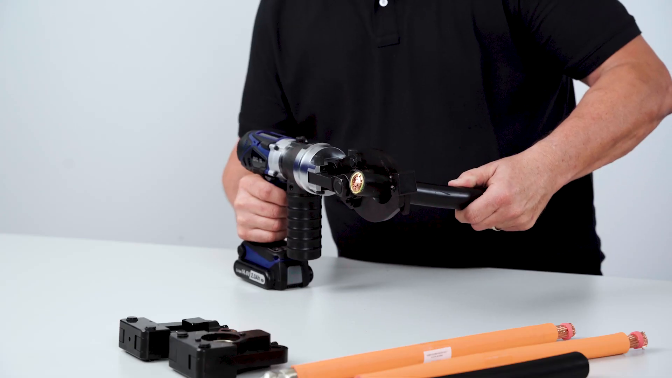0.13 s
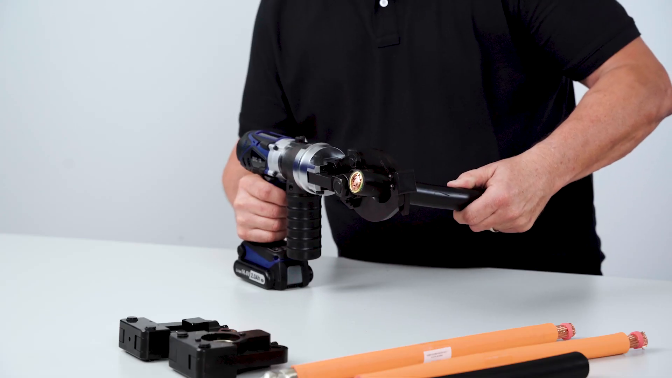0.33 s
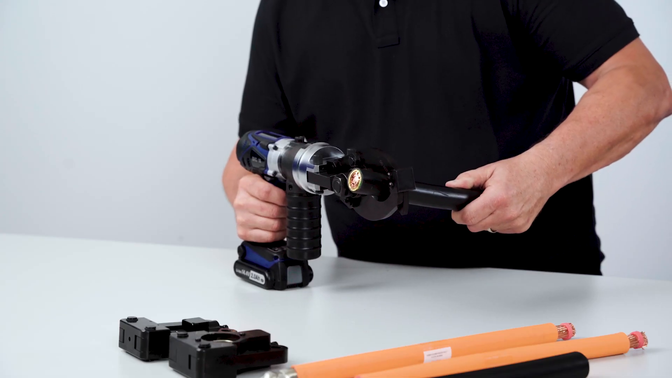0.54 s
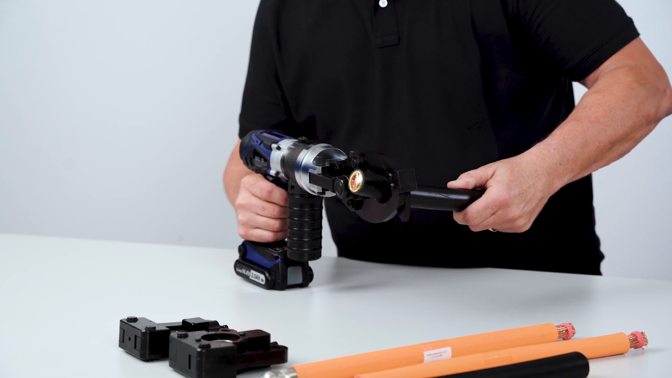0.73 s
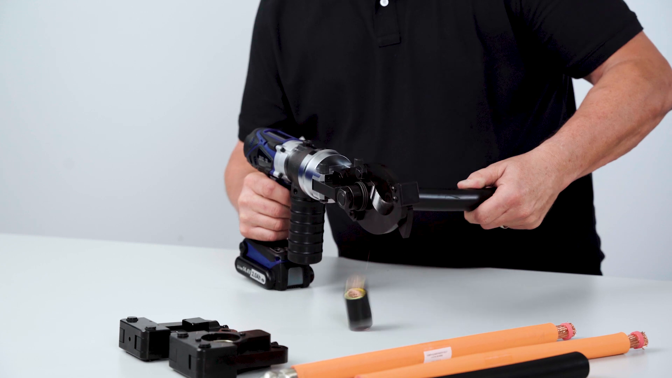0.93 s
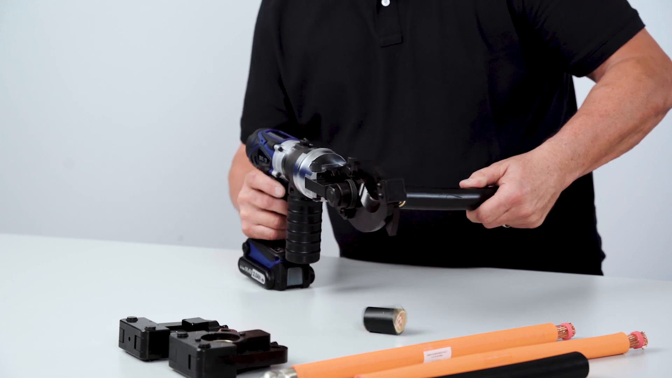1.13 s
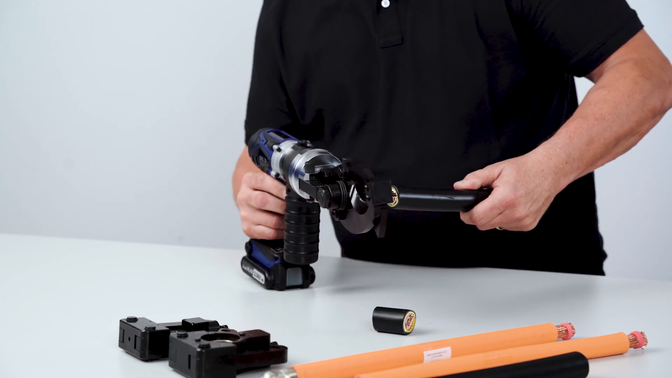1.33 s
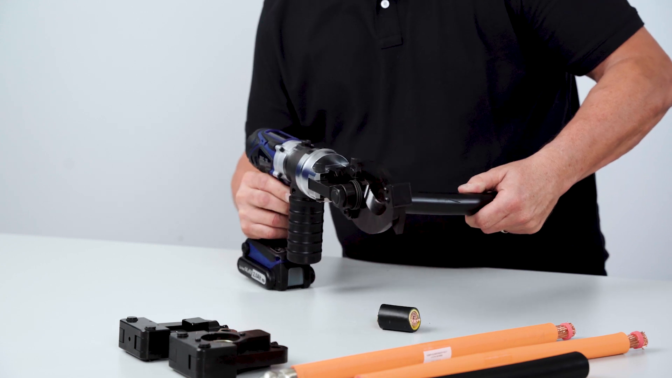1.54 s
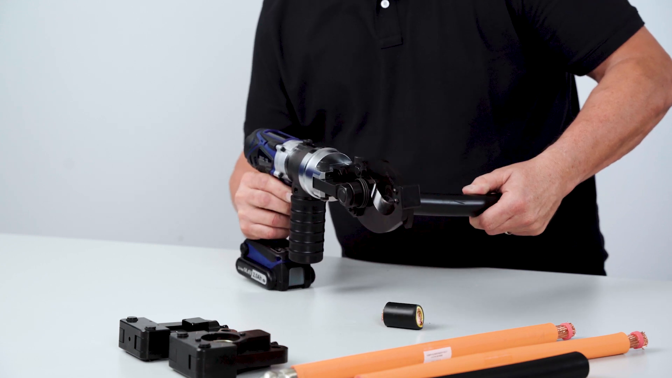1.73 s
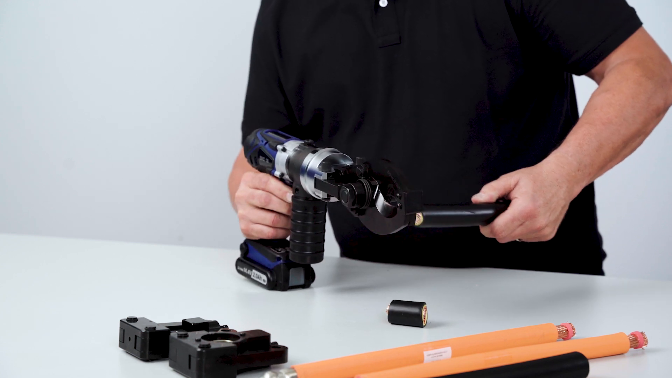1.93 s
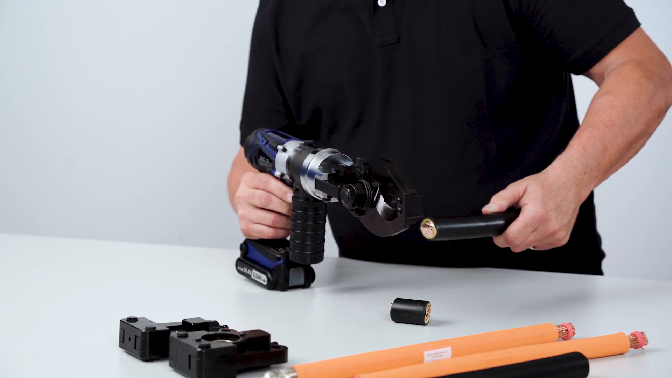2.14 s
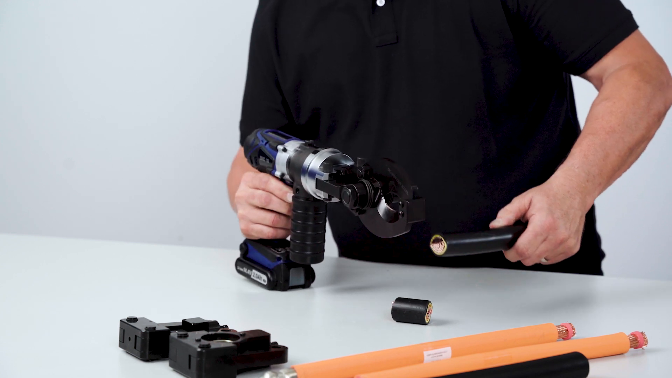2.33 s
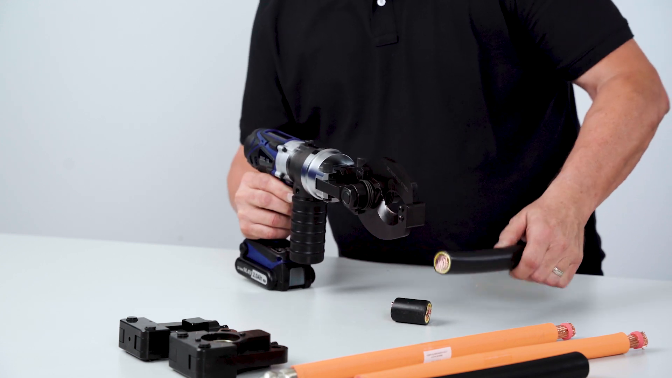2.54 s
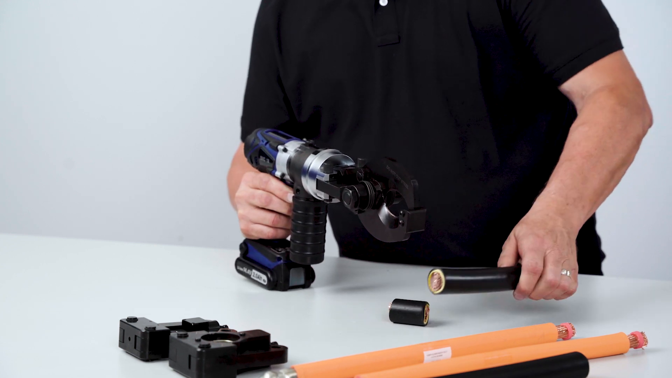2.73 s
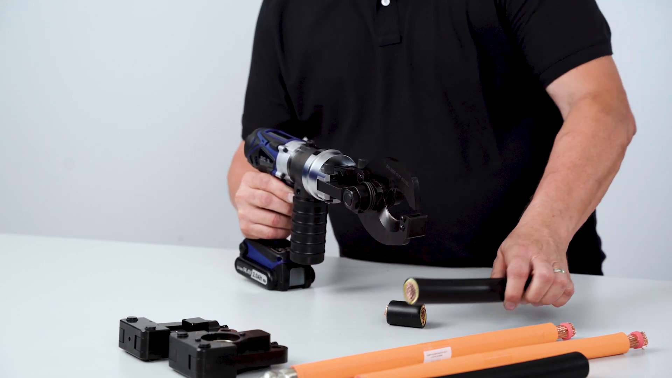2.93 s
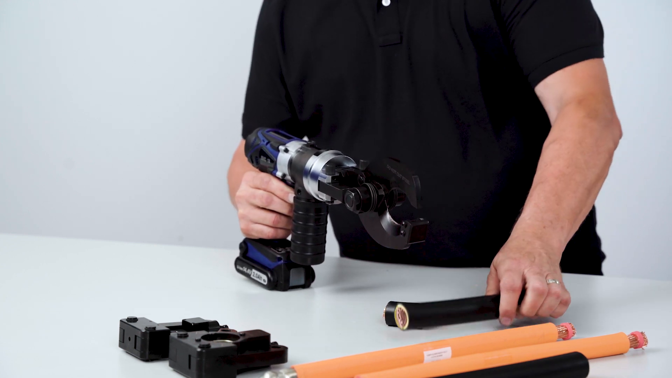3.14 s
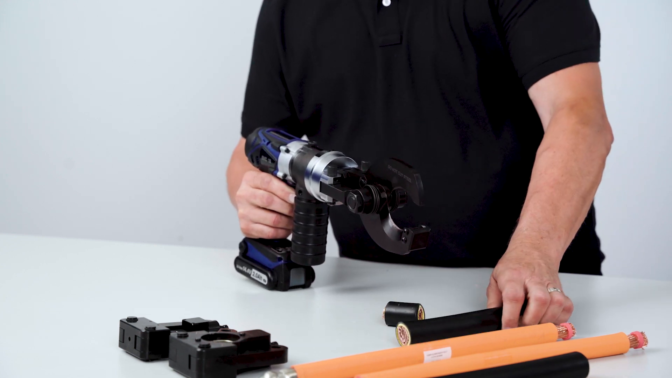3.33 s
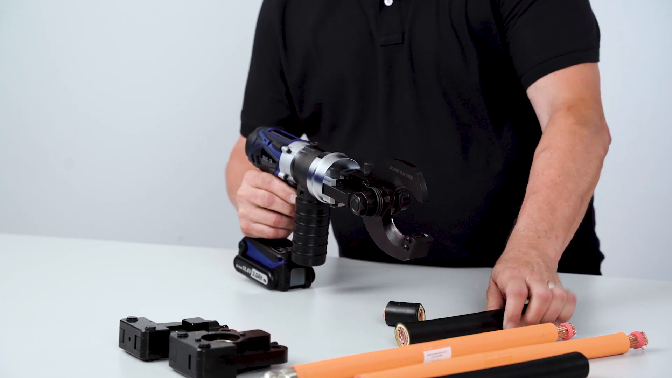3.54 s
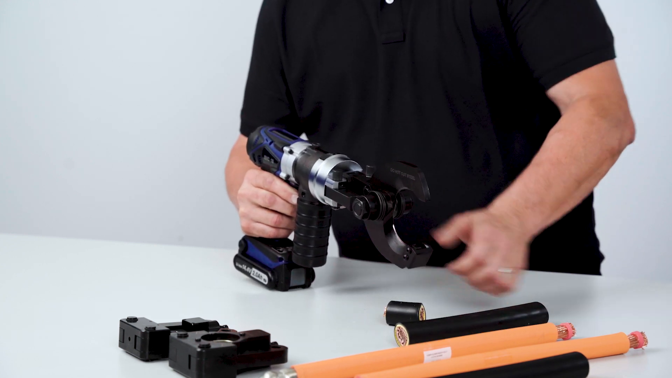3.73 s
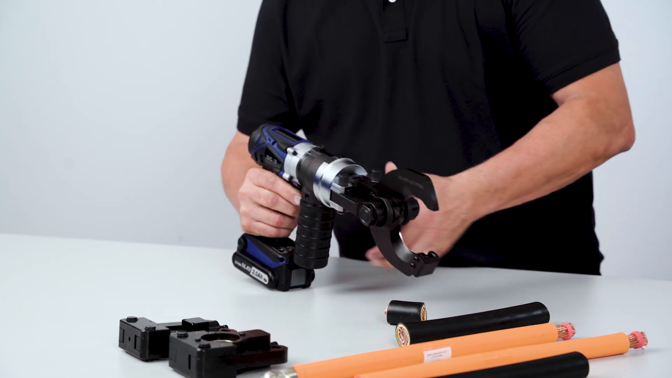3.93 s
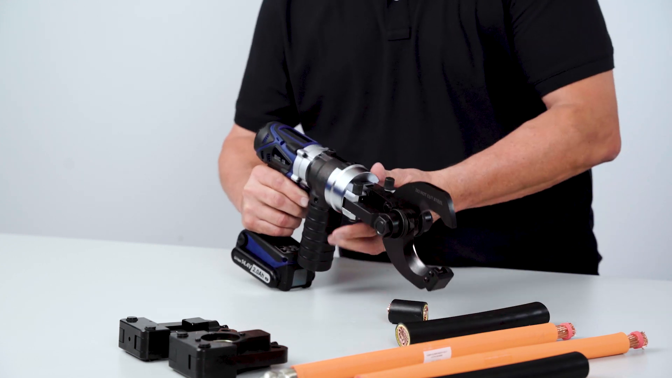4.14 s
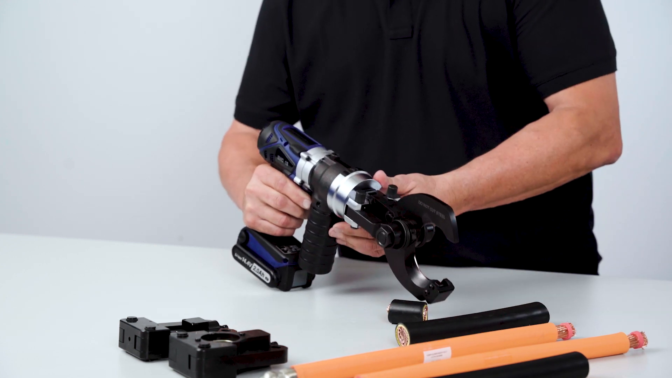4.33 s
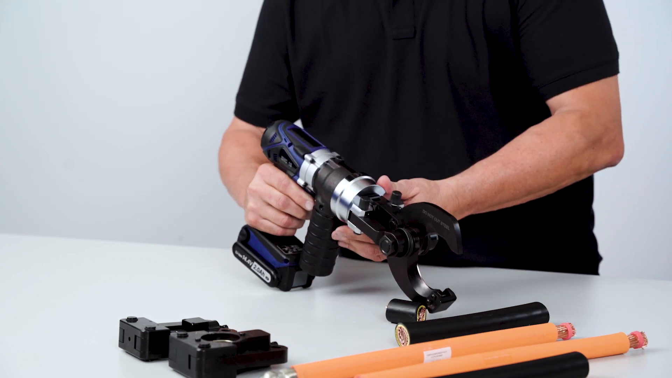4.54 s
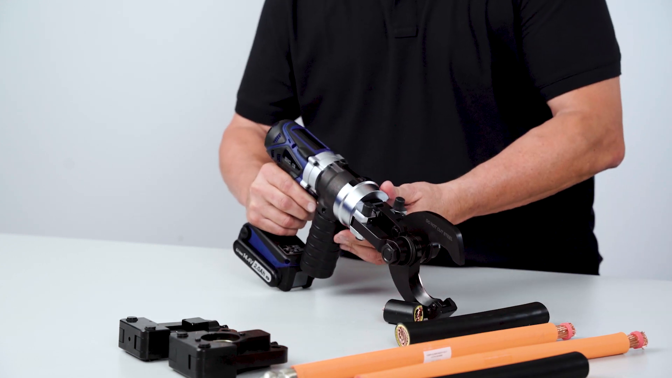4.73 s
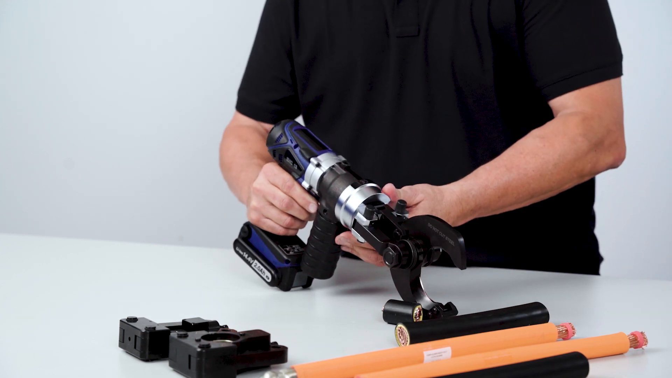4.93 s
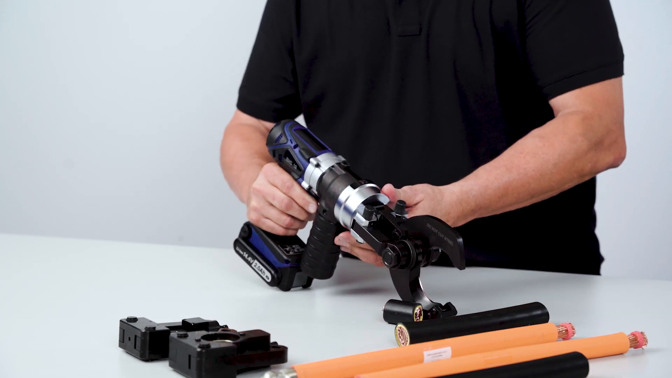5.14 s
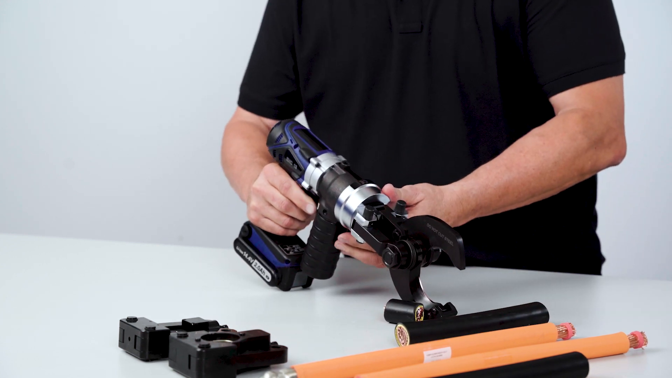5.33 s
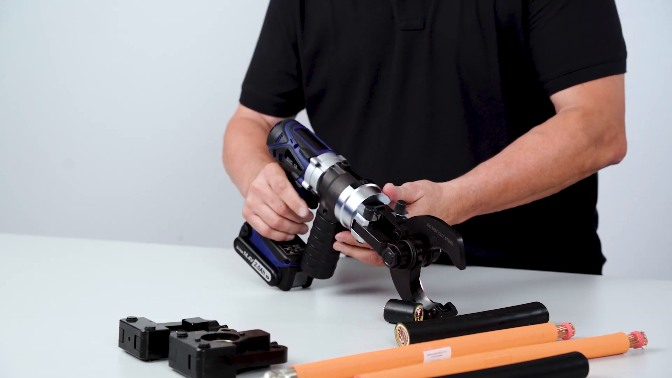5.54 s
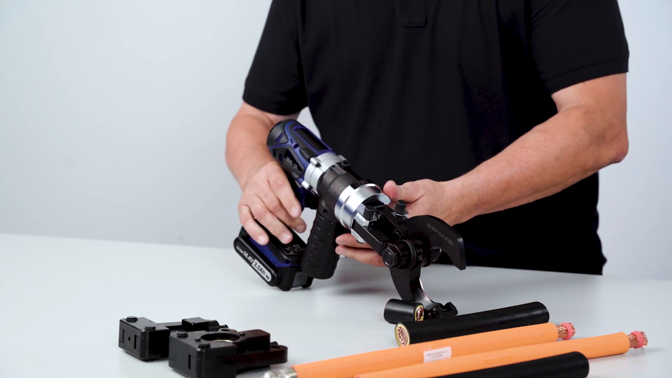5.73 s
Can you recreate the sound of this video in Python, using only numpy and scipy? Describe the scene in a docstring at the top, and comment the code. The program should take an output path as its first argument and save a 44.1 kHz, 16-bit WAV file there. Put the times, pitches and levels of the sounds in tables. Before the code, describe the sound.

In a small room, about a metre from the microphone, a cordless hydraulic tool pumps rapidly through a thick cable for about a second. The cable snaps, the motor runs free and cuts off, and the cut piece clatters onto a ringing table top. Wire strands scrape softly against the blades. After a lull, the cable and then the tool are set down with dull knocks and rubs, ending in light clicks.

```python
"""A battery hydraulic cutter pumps through a thick cable, a metre away in a small room.
Its gears rattle, its armature whines and its pump knocks with every stroke; the cable parts, the load
drops, and the motor whines free and stops. The offcut bounces and rings the table top, cut strands
scrape the blades, and cable and tool are put down with rubs, thuds and clicks.
A noise gate turns the quiet moments down and a limiter ducks after the loud blows."""
import sys
import numpy as np
from scipy import signal
from scipy.fft import rfft, irfft
from scipy.io import wavfile
from scipy.ndimage import uniform_filter1d, minimum_filter1d

SR = 44100
rng = np.random.default_rng(int(sys.argv[2]) if len(sys.argv) > 2 else 0)


def wrap_up_sound(samples):
    """Save the sound to the file named by the first command line argument, as 16-bit audio."""
    columns = np.atleast_2d(samples).T
    # keep every value between -1 and 1, then stretch to whole-number steps
    tamed = np.clip(columns, -1, 1)
    steps = np.round(tamed * 32767).astype(np.int16)
    wavfile.write(sys.argv[1], SR, steps)


N = 258867
T = np.arange(N) / SR
CUT_S, PARTING_S = 0.66, 0.02  # the cable gives way, and how long it takes
BRAKE_S, STOP_S = 1.055, 1.13  # trigger let go, armature halts
# envelope points: start, cut, just after it, running free, brake bites, halt
STAGES_S = [0, CUT_S, CUT_S + PARTING_S, BRAKE_S - PARTING_S, BRAKE_S + PARTING_S, STOP_S]
# modes of the table top: pitch_hz, level_db, t60_s
TABLE_MODES = [(117.3, -1, 0.18), (150, -8.5, 0.34), (203.4, -6.5, 0.22), (224.4, -2.5, 0.29),
               (231, -6.5, 0.49), (268.3, -6.5, 0.39), (296.3, -5.5, 0.78), (313.5, -6.5, 0.61),
               (350, -4.5, 0.18), (406, -0.5, 0.15), (430, 0, 0.16), (453.6, -4, 0.37), (480, -4.5, 0.3),
               (523.5, -2, 0.26), (553, -3, .2), (588, -2, 0.21), (635, -11.5, 0.46), (740, -12, 0.089),
               (709, -11.5, 0.58), (783, -14.5, 0.15), (853, -14, 0.11), (980, -14.5, 0.07),
               (1019.7, -16, 0.15), (1090, -14, 0.06), (1162, -14.5, 0.24), (1290, -21, 0.1),
               (1534, -24, 0.3), (1781, -29, 0.28)]


def cutter(turns_per_stroke=7.56, fade_db_per_s=397):
    """The motor drives an oil pump: gears, whine and blows all lock to its stroke."""
    t = T[:int(1.2 * SR)]
    parted = np.clip((t - CUT_S) / PARTING_S, 0, 1)
    load = 0.67 * (1 - parted) + 0.2 * parted  # oil load, 0-1
    speed = motor_speed(t, parted)
    strokes = np.cumsum(speed) / SR / turns_per_stroke - 0.237
    phase = strokes % 1
    tool = gear_rattle(phase, load, parted) + armature_whine(t, speed, phase, load)
    tool += pump_blows(t, strokes, load)
    level_db = np.interp(t, STAGES_S, [-17.5, -16, -18, -21, -21.5, -18])
    level_db -= fade_db_per_s * np.maximum(t - STOP_S, 0)
    return np.pad(tool * undb(level_db), (0, N - len(t)))


def motor_speed(t, parted, settle_s=0.12, slows_s=1.092):
    """Turns per second: creeping up as the cable thins, racing once it parts, drooping on the brake."""
    loaded_rps = 241.5 + 6.5 * (t / CUT_S) ** 2.5
    free_rps = 268.8 - 10 * np.exp((CUT_S + PARTING_S - t) / settle_s)
    braking = np.clip((t - slows_s) / (STOP_S - slows_s), 0, 1)
    return ((1 - parted) * loaded_rps + parted * free_rps) * (1 - 0.12 * braking)


def gear_rattle(phase, load, parted, repeat=0.66, grit_db=1.1):
    """Meshing teeth rattle through the casing, swelling with the stroke under load."""
    # swell over one stroke at full load: stroke_share, level_db
    stroke_shape = [(0, 10.5), (.07, -9.5), (.25, -8.5), (.47, -8.5), (.5, 8), (.65, -2), (.85, -2),
                    (.92, -3.5), (1, 4.5)]
    # gear noise spectrum: frequency_hz, level_db
    gear_spectrum = [(41, -46.5), (70, -24.5), (108, -17.5), (189, -27), (297, -12), (408, -15.5),
                     (572, -1.5), (879, -10), (1080, -7), (1810, -10.5), (3260, -4.5), (4580, -9.5),
                     (5740, -8), (7350, -17.5), (11000, -24), (15500, -30.5)]
    # casing resonances: pitch_hz, width_hz, boost_db
    casing_peaks = [(567, 120, 0), (2900, 900, -1), (3440, 640, 4), (7900, 470, 0)]
    # change of tone once the load drops: frequency_hz, gain_db
    unloaded_eq = [(100, 1), (300, 1.5), (600, -4), (1100, 2), (1500, -6.5), (2100, -1), (2800, 3.5),
                   (3600, 1), (4500, 0), (8000, 0), (15000, 3)]
    n = len(phase)
    # under load the same teeth meet alike on every stroke, so part of the rattle repeats
    share = repeat * load
    teeth = rng.standard_normal(SR // 32 + 1)[(phase * (SR // 32)).astype(int)]
    rattle = np.sqrt(share) * teeth + np.sqrt(1 - share) * rng.standard_normal(n)
    swell = undb(load * np.interp(phase, *np.transpose(stroke_shape)))
    grit = undb(grit_db * wander(500)[:n])
    gears = unit(colour(rattle * swell * grit, gear_spectrum, casing_peaks))
    return (1 - parted) * gears + parted * colour(gears, unloaded_eq)


def armature_whine(t, speed, phase, load, sag=0.11, throb=0.4):
    """Harmonics of the spin; each pressure stroke slows the armature and presses the teeth together."""
    # armature harmonics: cycles_per_turn
    orders = [1, 4, 6, 12, 18, 24, 30, 36, 42, 51]
    # voicing of each harmonic: free_db, loaded_db, flutter_db, settling_change_db
    voicing = [(-16.5, -23, -0.3, 1.6), (-17.5, -25, 3, 0.8), (-5.5, -24.5, 2.5, -12), (2, -6, 2, 0.95),
               (-17.5, -19, 4, -0.14), (-9, -4.5, 2.5, -0.9), (-18, -31.5, 4, -1.17), (-35, -21.5, 1, 0.5),
               (-22, -31, 3.5, 0.7), (-26, -42.5, 3.5, 1.1)]
    n = len(t)
    press = np.cos(2 * np.pi * (phase - 0.7))
    drag = sag * load ** 1.5 * np.cos(2 * np.pi * (phase - 0.84))
    turns = np.cumsum(speed * (1 - drag + 0.002 * wander(80)[:n])) / SR
    whine_db = np.interp(t, STAGES_S, [-5.5, -5.5, -3, 3.5, 1, -12.5]) + 0.47 * wander(200)[:n]
    free = (1 - load) * undb(whine_db) * (1 + throb * press)
    loaded = 2 * load * np.maximum(press, 0) ** 3.7
    settled = np.clip((t - CUT_S) / (BRAKE_S - CUT_S), 0, 1)
    whine = 0
    for order, (free_db, loaded_db, flutter_db, settle_db) in zip(orders, voicing):
        level = undb(free_db + settle_db * settled) * free + undb(loaded_db) * loaded
        flutter = undb(flutter_db * wander(90)[:n])
        whine += level * flutter * np.sin(2 * np.pi * order * turns)
    return whine


def pump_blows(t, strokes, load, valve_fades_s=0.31, fade_length_s=0.09):
    """Knocks inside the pump on every stroke; the closing valve fades out before the cut."""
    # blows of one stroke: stroke_share, pitch_hz, t60_s, level_db, is_valve
    stroke_blows = [(.965, 3450, .005, 16, 1), (.975, 2800, .004, 8, 1), (.98, 5300, .004, 8, 1),
                    (.97, 8500, .003, 2, 1), (.02, 595, .035, -2, 1), (.47, 575, .04, -1.5, 0),
                    (.49, 487, .07, -8, 0), (.5, 228, .08, -15, 0), (.48, 3300, .007, 6, 0),
                    (.57, 1200, .02, -3, 0), (.55, 290, .06, -17, 0)]
    valve = 0.53 * np.clip(1 - (t - valve_fades_s) / fade_length_s, 0, 1)
    blows = 0
    for at, hz, t60, db, is_valve in stroke_blows:
        hit = np.diff(np.floor(strokes - at), prepend=-1) > 0
        force = hit * (valve if is_valve else load ** 2) * undb(db + 1.2 * rng.standard_normal(len(t)))
        # oil softens each blow into a short push: ringing it twice rounds the attack
        makeup = 2 * np.e * np.log(1000) / (t60 * SR)
        blows += ring(ring(force, hz, t60), hz, t60) * makeup
    return blows


def table_knocks(place_db=2.0, soft_db_per_octave=-3.5):
    """A short thud and scuff from the contact, then the table modes, weighted by where the blow lands."""
    # blows on the table, thud and scuff relative to the ring:
    # start_s, ring_db, thud_hz, thud_db, ring_time_share, tilt_db_per_octave, bass_db, scuff_db
    landings = [(0.651, -24, 150, -4.5, 0.42, 18.5, 5.5, -30), (0.855, -24, 286, 6.5, 0.44, -14, 23, -13),
                (1.039, -8.5, 480, 13.5, 0.35, 1.5, 7.5, -1.5),
                (1.131, -17.5, 690, 14, 0.44, -2.5, 3.5, -3.5), (1.2079, -5.5, 441, 9.5, 0.29, 1, 4.5, -12),
                (1.2494, -10, 480, 13, 0.3, 0.5, -1.5, -17), (1.2696, -16.5, 376, 13, 0.17, 4.5, -3, -29),
                (1.412, -40, 350, -7, .3, -1.5, -12, -21.5), (1.525, -40.5, 396, -10.5, 0.8, 4, 14.5, 1.5),
                (1.54, -51.5, 296, -14.5, 0.44, 3, -15, -13.5),
                (3.3830, -23, 430, 10, 0.76, -0.5, -1.5, -16), (3.4493, -20.5, 430, 12.5, 0.35, -3, 1, -18),
                (3.468, -25.5, 480, 2, 0.28, 1.5, -9, -17),
                (3.576, -25.5, 252, 8.5, 0.73, -9.5, -3.5, -15.5),
                (3.775, -41, 258, 4.5, 0.55, -6.5, -2, -38), (3.789, -46.5, 300, 3.5, 0.21, -4, -5, -29),
                (4.011, -41.5, 282, 1.5, 0.35, -2.5, 1, -30),
                (4.222, -44.5, 287, -10.5, 0.45, -4.5, -7, -33.5),
                (4.4596, -35.5, 480, 5, 0.16, 0.5, -5, -20), (4.4731, -35, 330, 9, 0.29, -0.5, -1, -17.5),
                (4.5, -34.5, 250, 2, 0.34, -2, 21, -17), (4.951, -18.5, 277, 7.5, 0.47, -8, -6.5, -15),
                (4.961, -23, 230, 1.5, 0.34, -11, -4, -10.5), (4.988, -23.5, 197, -2, 0.49, -15.5, -7, -22),
                (5.014, -28.5, 230, 10.5, 0.33, -16, 0, -23), (5.043, -31, 230, 0, 0.13, -10, 11, -21),
                (5.125, -41, 204, -8, 0.71, -6, -2, -28)]
    # frequency_hz, level_db
    scuff_spectrum = [(350, -34.5), (800, 14.5), (1300, 5), (2000, 0.5), (3000, -6.5),
                      (5000, -20.5), (15000, -35.5)]
    out, t = np.zeros(N), T[:SR // 2]
    for start, db, thud_hz, thud_db, share, tilt, bass_db, scuff_db in landings:
        body, place = 0, rng.standard_normal((len(TABLE_MODES), 2))
        for (hz, mode_db, t60), (near, lag) in zip(TABLE_MODES, place):
            lean_db = tilt * np.log2(hz / 260) + bass_db * (hz < 180)
            lean_db += soft_db_per_octave * max(np.log2(hz / 600), 0)  # soft contact dulls the ring
            envelope = undb(mode_db + lean_db + place_db * near - 60 * t / (t60 * share))
            body += envelope * np.sin(2 * np.pi * hz * t + 2 * lag)
        body = unit(body, count=2000) * (1 - np.exp(-t / 0.0045))
        cycles = t * thud_hz  # the thud lasts two cycles: up, deep down, up
        thud = -np.cos(2 * np.pi * cycles) * np.sin(np.pi * np.clip(cycles / 2, 0, 1)) ** 1.4
        scuff = unit(colour(rng.standard_normal(len(t)), scuff_spectrum))
        scuff *= undb(scuff_db - 60 * t / 0.2) * np.minimum(t / 0.00099, 1)
        add(out, start, undb(db) * (body + undb(thud_db) * thud + scuff))
    return out


def hard_clicks():
    """Strands, latch and trigger click: a sharp crack over a noise burst in one short resonance."""
    # clicks, crack relative to the ring: start_s, ring_peak_db, pitch_hz, t60_s, crack_db
    clicks = [(0.6682, -1.5, 2050, 0.013, -5), (0.7938, -5, 2200, 0.018, -1.5),
              (0.8524, -7, 3285, 0.017, 2), (1.1287, -1.5, 3640, 0.023, -9),
              (1.1308, -7.5, 10800, .012, -8), (1.1335, -6, 3300, 0.014, -14), (1.2085, -17, 1800, 0.03, 9),
              (1.2501, -22, 1820, 0.028, 8), (1.27, -37, 1970, 0.0195, 13),
              (1.398, -29.5, 3080, 0.0085, -3), (1.412, -37, 2550, 0.027, -51),
              (1.5246, -27, 2640, 0.028, -24.5), (3.758, -37, 2070, 0.025, -1),
              (3.786, -42, 2680, 0.018, -21), (3.7909, -34, 2580, 0.045, -22),
              (5.3732, -27, 4700, 0.013, -13), (5.374, -33, 2200, .02, -16), (5.383, -40, 4900, 0.03, -9),
              (5.4125, -38, 4500, 0.012, -14), (5.501, -42, 3200, 0.03, -4), (5.5125, -42, 3200, 0.02, -6),
              (5.6035, -33, 2570, 0.04, -8), (5.627, -42, 2600, 0.02, -12)]
    # frequency_hz, level_db
    crack_spectrum = [(800, -14), (3000, -1), (6000, -4.5), (15000, -7)]
    out, t = np.zeros(N), T[:SR // 8]
    for start, db, hz, t60, crack_db in clicks:
        burst = (0.66 * rng.standard_normal(len(t)) + 2 * (t == 0)) * undb(-60 * t / t60)
        crack = colour(rng.standard_normal(len(t)), crack_spectrum) * undb(-60 * t / 0.0034)
        body = ring(burst, hz, t60 / 8)
        add(out, start, undb(db) * (body / np.abs(body).max() + undb(crack_db) * crack))
    return out


def blade_scrapes(slips_per_s=115, uneven=0.38, scatter_db=1.5):
    """Cut strands stick and slip as the cable is drawn out, ringing the blades."""
    # runs of slips: start_s, length_s, force_db
    catches = [(1.925, .012, -51.5), (2.016, .035, -46), (2.085, .012, -49), (2.185, .012, -44),
               (2.232, .012, -43.5), (2.276, .065, -41.5), (2.396, .04, -45)]
    # blade modes: pitch_hz, level_db, t60_s
    blade_modes = [(2630, 5.2, .008), (3370, -7, 0.0052), (1910, 2.5, 0.0065), (1290, -1, 0.012)]
    force = np.zeros(N)
    for start, length, db in catches:
        timing, strength = rng.standard_normal((2, 12))
        slips_s = np.cumsum(np.maximum(1 + uneven * timing, 0.2) / slips_per_s)
        slips_s -= slips_s[0]
        force[((start + slips_s) * SR).astype(int)] += undb(db + scatter_db * strength) * (slips_s < length)
    return sum(undb(db) * ring(force, hz, t60) for hz, db, t60 in blade_modes)


def handling(uneven_db=0.9, fade_share=0.3, bass_cut_db_per_octave=6):
    """Hands, sleeve and the rocking offcut rub the table modes awake, with a drier rustle above."""
    # bouts of rubbing, rustle relative to the rub: start_s, end_s, level_db, rustle_db
    bouts = [(1.791, 2.089, -52.5, -11), (2.067, 2.57, -48, -6.5), (2.951, 3.302, -57, -9.5),
             (4.046, 4.151, -58, -31), (4.417, 5.036, -46.5, -18.5), (4.994, 5.485, -45, -14)]
    # frequency_hz, level_db
    rustle_spectrum = [(500, -20), (1200, -2), (2700, 0), (3500, -10), (4500, -26), (15000, -42)]
    rub = rng.standard_normal(N) * undb(1.6 * wander(90))
    body = 0
    for hz, db, t60 in TABLE_MODES:
        lean_db = bass_cut_db_per_octave * min(np.log2(hz / 300), 0)
        body += undb(db + lean_db) * ring(rub, hz, t60 * 0.85)
    body_gain, rustle_gain = undb(-63), undb(-64)  # a faint stir never stops
    for start, end, db, rustle_db in bouts:
        swell = np.clip(np.minimum(T - start, end - T) / (fade_share * (end - start)) + 0.5, 0, 1)
        body_gain += undb(db) * swell
        rustle_gain += undb(db + rustle_db) * swell
    body = unit(body) * body_gain * undb(uneven_db * wander(2.5))
    rustle = unit(colour(rub, rustle_spectrum)) * rustle_gain * undb(uneven_db * wander(6.8))
    return body + rustle


def room(x, wet_db):
    """Dense reflections off close walls; every band dies at its own rate."""
    # reverb bands: centre_hz, t60_s
    decays = [(150, 0.42), (400, 0.23), (1000, 0.3), (2500, 0.2), (6000, 0.4), (12000, 0.14)]
    t, tail = T[:SR // 2], 0
    for hz, t60 in decays:
        band = [(hz / 2.5, -30), (hz / 1.5, 0), (hz * 1.5, 0), (hz * 2.5, -30)]
        tail += colour(rng.standard_normal(len(t)), band) * undb(-60 * t / t60)
    tail *= np.clip((t - 0.004) / 0.024, 0, 1)
    return x + undb(wet_db) * signal.fftconvolve(x, tail / np.sqrt(np.sum(tail ** 2)))[:N]


def room_tone():
    """A steady, dark bed of noise."""
    # background spectrum: frequency_hz, level_db
    spectrum = [(60, -27), (120, -9), (290, -4), (420, -13), (680, -3), (950, -11), (1500, -14),
                (3000, -25), (4500, -30), (9000, -32.5), (15500, -40)]
    return unit(colour(rng.standard_normal(N), spectrum))


def noise_gate(loud_db, open_db=-32.5, slope=1.15, depth_db=-21.5, hold_s=0.016, release_s=0.0054):
    """Gain in dB that opens at once and turns quiet moments down after a short hold."""
    hold = int(hold_s * SR)
    held_db = -minimum_filter1d(-loud_db, hold, origin=(hold - 1) // 2)
    gain_db = np.clip(slope * (held_db - open_db), depth_db, 0)
    return np.maximum(gain_db, smooth(gain_db, release_s))


def limiter(loud_db, threshold_db=-15, squeeze=0.91, recover_s=0.042):
    """Gain in dB that ducks a few ms late, so the first cycle of a hard knock gets through."""
    over_db = np.roll(np.maximum(loud_db - threshold_db, 0), 200)
    peak_db = -minimum_filter1d(-over_db, size=601, origin=300)
    return -squeeze * np.maximum(over_db, smooth(peak_db, recover_s))


def undb(db):
    """Decibels to gain."""
    return 10 ** (np.asarray(db) / 20)


def unit(x, count=None):
    """Scale to rms 1 over the first count samples."""
    return x / np.sqrt(np.mean(x[:count] ** 2))


def colour(x, points, peaks=()):
    """EQ by (frequency_hz, gain_db) points and (pitch_hz, width_hz, boost_db) peaks."""
    hz = np.maximum(np.arange(len(x) // 2 + 1) * SR / len(x), 1)
    point_hz, point_db = np.transpose(points)
    db = np.interp(np.log(hz), np.log(point_hz), point_db)
    db += sum(boost / (1 + ((hz - pitch) * 2 / width) ** 2) for pitch, width, boost in peaks)
    return irfft(rfft(x) * undb(db), len(x))


def ring(x, hz, t60):
    """One decaying mode, peak near 1 for a unit impulse."""
    r, w = np.exp(-np.log(1000) / (t60 * SR)), 2 * np.pi * hz / SR
    return signal.lfilter([0, np.sin(w)], [1, -2 * r * np.cos(w), r * r], x)


def add(out, start_s, x):
    """Mix x in at start_s."""
    i = int(start_s * SR)
    out[i:i + len(x)] += x[:N - i]


def wander(rate_hz):
    """Glides between random levels; spread near 1."""
    step = int(SR / rate_hz)
    return uniform_filter1d(np.repeat(rng.standard_normal(N // step + 1), step), step)[:N]


def smooth(x, lag_s):
    """One-pole lag."""
    rate = 1 / (lag_s * SR)
    return signal.lfilter([rate], [1, rate - 1], x)


def scene():
    """Tool, table and hands; the table top radiates widely, so the walls return more of it."""
    tool = room(cutter() + hard_clicks() + blade_scrapes(), wet_db=-24.5)
    table = room(table_knocks(), wet_db=-10)
    return (tool + table + handling())[None]


def record(dry, top_hz=15700):
    """Room tone joins; gate and limiter ride the level; peaks clip; bass and top are cut."""
    tone = room_tone() * undb(-48)
    x, tone = signal.sosfilt(signal.butter(4, 90, "high", fs=SR, output="sos"), [dry[0] + tone, tone])
    loud_db = 10 * np.log10(uniform_filter1d(x ** 2, size=300) + 1e-12)
    gate_db = noise_gate(loud_db)
    # steady noise comes back more slowly than the blow that opens the gate
    tone_lag_db = np.minimum(smooth(gate_db, lag_s=0.014) - gate_db, 0)
    x -= tone * (1 - undb(tone_lag_db))
    x *= undb(gate_db + limiter(loud_db))
    x = signal.sosfilt(signal.butter(3, 72, "high", fs=SR, output="sos"), x)
    x = signal.sosfilt(signal.ellip(10, 0.2, 70, top_hz, fs=SR, output="sos"), np.clip(x, -1, 1))
    return np.clip(x, -1, 1)[None]


dry = scene()
out = record(dry)
wrap_up_sound(out)
```